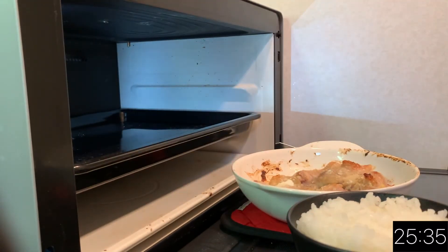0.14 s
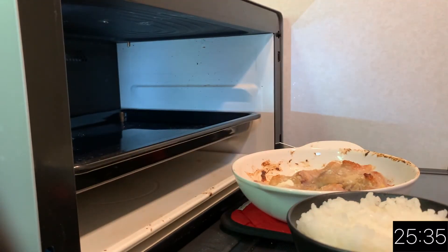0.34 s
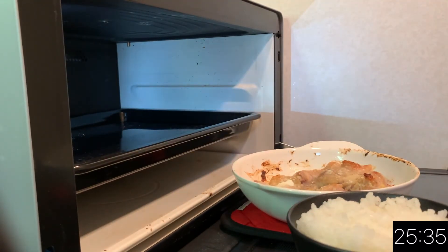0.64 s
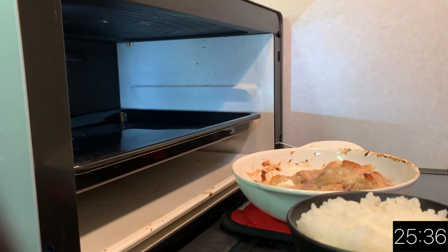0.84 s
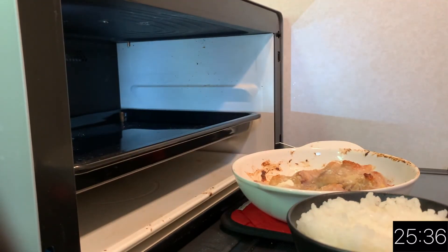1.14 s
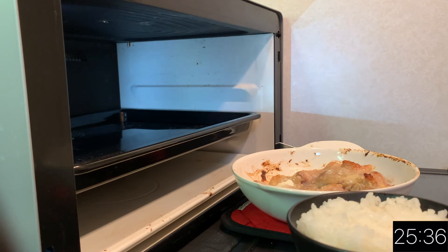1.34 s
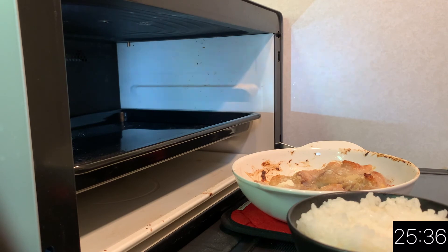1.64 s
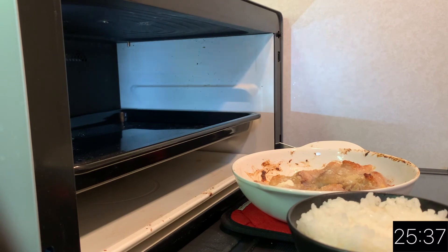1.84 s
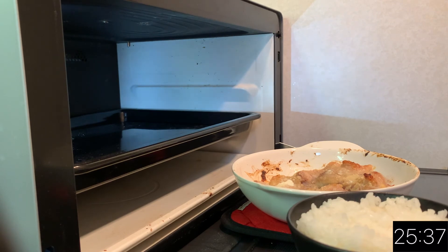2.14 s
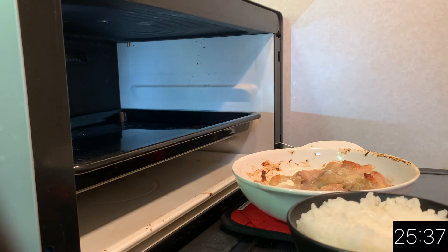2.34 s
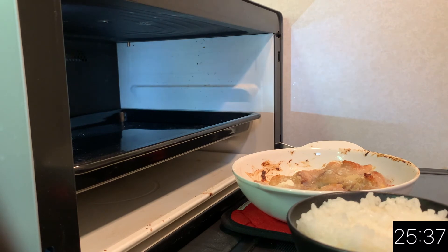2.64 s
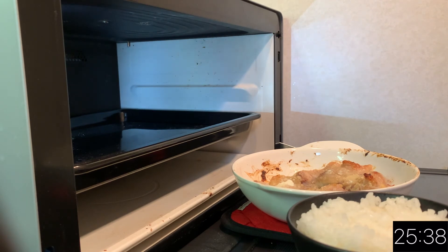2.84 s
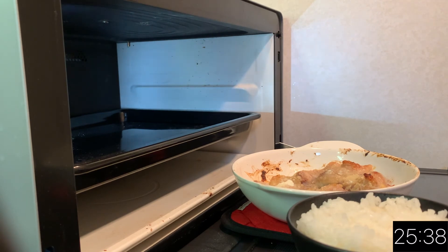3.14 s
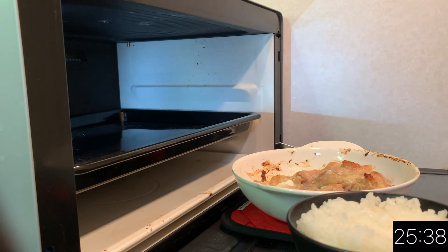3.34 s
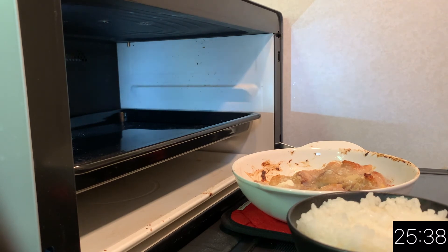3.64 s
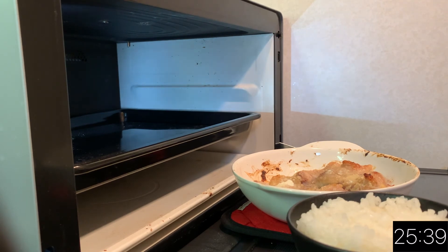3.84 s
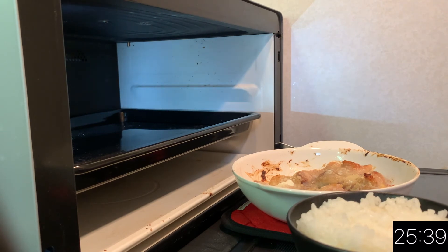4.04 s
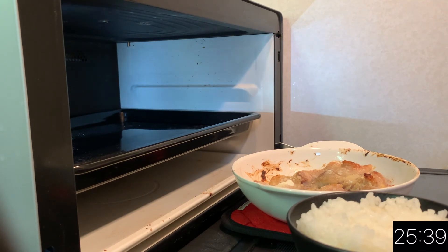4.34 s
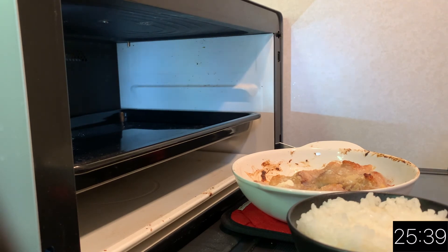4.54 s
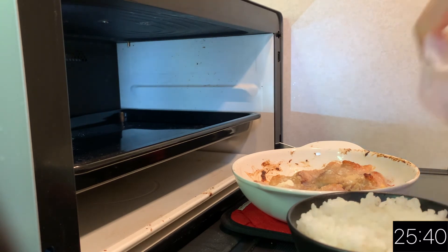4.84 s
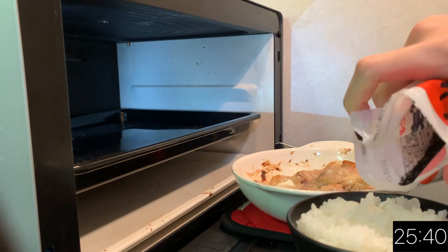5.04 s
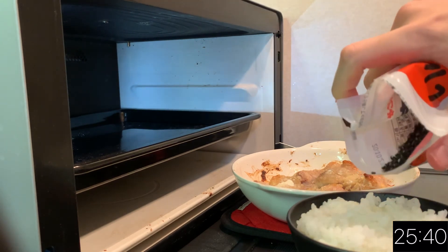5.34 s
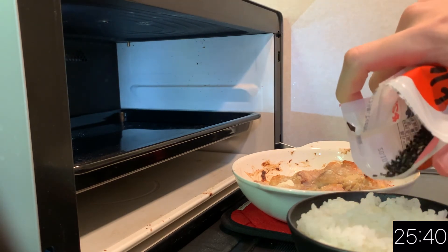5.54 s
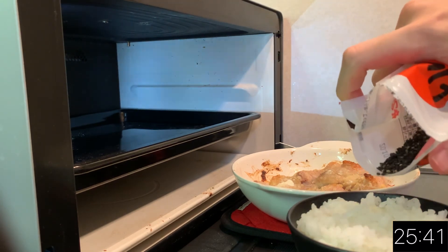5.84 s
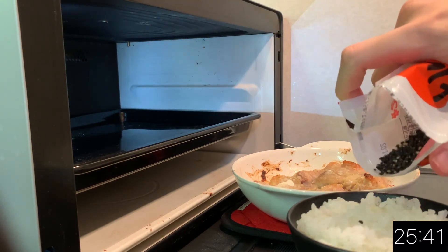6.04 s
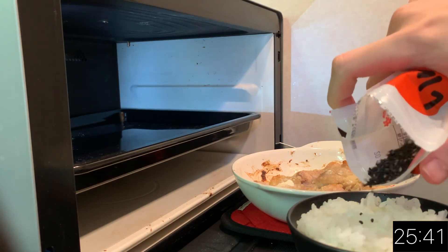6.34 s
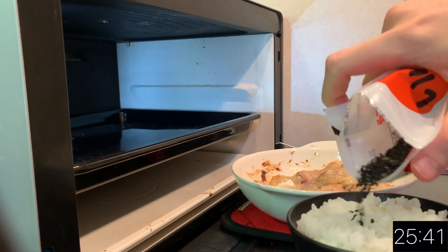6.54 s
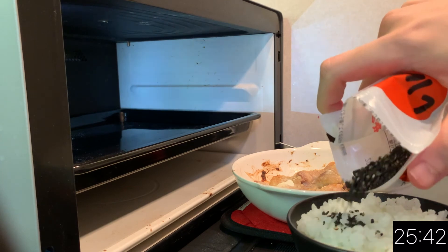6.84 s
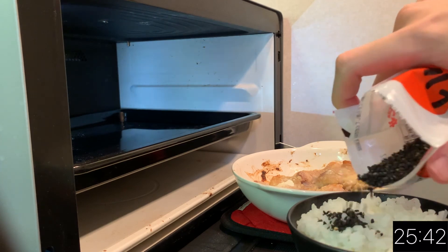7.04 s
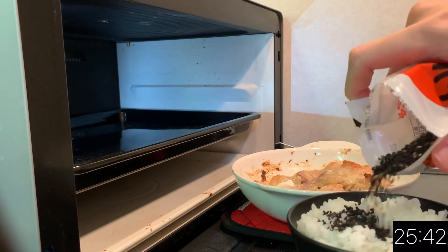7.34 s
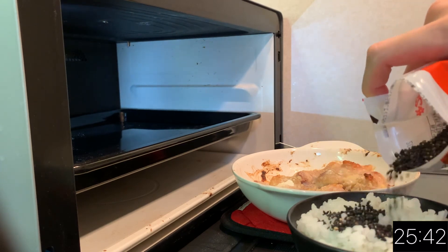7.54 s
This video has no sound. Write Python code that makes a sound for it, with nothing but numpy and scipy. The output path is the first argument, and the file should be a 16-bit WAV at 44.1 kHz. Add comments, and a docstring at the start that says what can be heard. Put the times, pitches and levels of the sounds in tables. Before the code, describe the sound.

A fan and humming appliance motors fill a small kitchen while a plastic packet rustles and clicks right by the microphone. After a brief loud crinkle and a soft low bump on the counter, the packet is tugged open with crisp, crowded snaps. It then goes much quieter: seeds slip along the plastic and trickle out in short, gentle shakes as the hum takes on a quick pulse.

```python
"""Sesame packet in a small kitchen

Close to a stereo pair of microphones, a plastic packet is picked up, pulled open and crinkled:
its folds snap and its film rubs under the fingers. Tipped and gently shaken over a bowl of rice,
it lets the seeds slide out. The counter takes one soft knock. Behind it all a fan blows and
appliance motors hum, two of their tones beating into a steady throb."""
import sys
import numpy as np
from scipy import signal
from scipy.fft import rfft, irfft
from scipy.io import wavfile

SR = 44100
rng = np.random.default_rng(int(sys.argv[2]) if len(sys.argv) > 2 else 0)


def master_out(mix):
    """Clip the mix to full scale and print it as 16-bit PCM to the path in sys.argv[1]."""
    frames = np.transpose(np.atleast_2d(mix))
    ceiling = np.clip(frames, -1, 1)
    pcm = np.round(ceiling * 32767).astype(np.int16)
    wavfile.write(sys.argv[1], SR, pcm)


N = 338688
TIME, FREQS = np.arange(N) / SR, np.fft.rfftfreq(N, 1 / SR)
TIPPED_S = 4.7
LEFT_RIGHT = np.array([[.5], [-.5]])


def from_db(db):
    return 10 ** (np.asarray(db) / 20)


def rms_one(x):
    return x / np.sqrt(np.mean(x ** 2) + 1e-20)


def unit_energy(x):
    return x / (np.linalg.norm(x, axis=-1, keepdims=True) + 1e-12)


def at_hz(points, hz):
    knots, values = np.transpose(points)
    return np.interp(np.log(hz + 1), np.log(knots), values)


def pan(left_over_right_db):
    return from_db(LEFT_RIGHT * left_over_right_db)


def band(x, hz, kind):
    return signal.sosfilt(signal.butter(2, hz, kind, fs=SR, output="sos"), x + 1e-18)


def drift(hz):
    """Smooth random wander of rms 1, mostly slower than hz."""
    step, settle = 40, 2000
    pole = np.exp(-2 * np.pi * hz * step / SR)
    noise = rng.standard_normal(N // step + settle + 2)
    slow = signal.lfilter([1], [1, -2 * pole, pole * pole], noise)[settle:]
    return np.interp(np.arange(N) / step, np.arange(len(slow)), rms_one(slow))


def colour(x, spectrum, size=2048):
    """Minimum-phase filter of unit energy, shaped by (Hz, dB) points."""
    cepstrum = irfft(np.log(from_db(at_hz(spectrum, np.fft.rfftfreq(size, 1 / SR)))))
    cepstrum[1:size // 2] *= 2
    cepstrum[size // 2 + 1:] = 0
    response = irfft(np.exp(rfft(cepstrum)))
    return signal.oaconvolve(x, unit_energy(response))[:N]


def grains(per_s, spread_db):
    """Tiny clicks of uneven size at random moments; rms 1."""
    sizes = from_db(spread_db * np.minimum(rng.exponential(1, N), 4)) * rng.choice([-1, 1], N)
    return rms_one(sizes * (rng.random(N) < per_s / SR))


def gestures(rows, attack_s=.019, release_s=.022):
    """Each movement rises, holds and dies away; overlapping ones add in power."""
    power = np.zeros(N)
    for start, length, db in rows:
        at = int(start * SR)
        age = TIME[at:at + SR] - TIME[at]
        rise = np.sin(np.pi / 2 * np.minimum(age / attack_s, 1)) ** 2
        fall = np.exp(-np.maximum(age - length, 0) / release_s)
        power[at:at + SR] += (from_db(db) * rise * fall) ** 2
    return np.sqrt(power)


def mic_pair(mid, side, likeness):
    """Left and right from two unrelated signals, with a likeness that depends on frequency."""
    alike = np.clip(at_hz(likeness, FREQS), -1, 1)
    common = np.sqrt((1 + alike) / 2) * rfft(mid)
    opposed = np.sqrt((1 - alike) / 2) * rfft(side)
    return irfft([common + opposed, common - opposed], N)


# The fan's air at the microphones. Each row: frequency in Hz, level in dB.
FAN_SPECTRUM = [(31, -55), (44, -20), (58, -2.5), (80, 0), (130, -2.5), (165, -4), (280, -4), (380, -3.5),
                (520, -10.5), (700, -6.5), (1080, -9), (1400, -14), (2000, -22), (3500, -29), (15000, -52)]
# Each row: frequency in Hz, likeness of left and right (held within -1 to 1 when played).
FAN_LIKENESS = [(50, 0.8), (130, 1), (280, 0.65), (520, 0.3), (1200, 0.42), (3000, -0.5), (12000, 3.5)]
# Each row: frequency in Hz, left over right in dB.
FAN_BALANCE = [(60, 3.5), (150, 1), (380, -1.5), (1300, -2), (5000, -0.5)]


def fan(db=-48):
    """An even rush of air fills the room behind the packet."""
    air = rfft(mic_pair(*rng.standard_normal((2, N)), FAN_LIKENESS))
    shaped = air * from_db(at_hz(FAN_SPECTRUM, FREQS)) * pan(at_hz(FAN_BALANCE, FREQS))
    return from_db(db) * rms_one(irfft(shaped, N))


# Fan, compressor and mains in the background.
# Each row: frequency in Hz, level in dB, left over right in dB, lead at the left in radians.
HUM_TONES = [(45.7, -59, 1, 0), (100, -64, 1, 0), (119.4, -64, 7, -.7), (131.5, -65, 2, .1),
             (191.9, -49.5, 6, -1.1), (201.2, -65, 5, -.6), (319.6, -55.3, 1, .1), (335.8, -61.5, 0, 0),
             (384.7, -66, -4, -.9), (399.7, -63.5, -1, -1.4), (439.7, -66, -1, 0), (671.6, -66, -2, .6),
             (1343.2, -61, -4, .6)]
# A second motor tone, just below the strongest. Each row: time in seconds, level in dB.
THROB_LEVEL = [(0, -58), (.5, -65), (3.3, -66), (4, -58), (4.9, -51.3), (7.68, -51.3)]


def hum(waver_db=1.35, wander_rad_per_hz=.002, beat_hz=9.26, crest_s=6.173):
    """Motor tones whose phase wanders more the higher they are; the close pair throbs."""
    def tone(phase, db, side_db, lead):
        return np.sqrt(2) * from_db(db) * pan(side_db) * np.cos(phase + lead * LEFT_RIGHT)

    turn = 2 * np.pi * (TIME - crest_s)
    out = np.zeros((2, N))
    for hz, db, side_db, lead in HUM_TONES:
        phase = hz * (turn + wander_rad_per_hz * drift(.88))
        out += tone(phase, db + waver_db * drift(8.5), side_db, lead)
    strongest_hz = max(HUM_TONES, key=lambda row: row[1])[0]
    throb_db = np.interp(TIME, *np.transpose(THROB_LEVEL))
    return out + tone((strongest_hz - beat_hz) * turn, throb_db, side_db=6.9, lead=.88)


def counter_knock(start_s=1.768, hz=55, swell_s=.026, db=-26.5):
    """A soft knock on the counter, left of centre: a few deep cycles."""
    age = np.maximum(TIME - start_s, 0)
    swell = (age / swell_s) ** 2 * np.exp(2 * (1 - age / swell_s))
    return from_db(db) * swell * np.sin(2 * np.pi * hz * age) * pan(3.4)


def echo_pattern(near_db=1, near_s=.0043, tail_db=-7.5, t60_s=.32):
    """Quick reflections off the nearby oven and wall, then the ring of the room."""
    t = np.arange(SR // 2) / SR
    shape = (2, len(t))
    sparse = rng.standard_normal(shape) * (rng.random(shape) < .2)
    near = sparse * np.exp(-t / near_s) * (t > .0004)
    tail = rng.standard_normal(shape) * from_db(-60 * t / t60_s) * (1 - np.exp(-t / .0045))
    return from_db(near_db) * unit_energy(near) + from_db(tail_db) * unit_energy(tail)


# The direct path. Each row: frequency in Hz, phase of the left microphone re the right in radians.
DIRECT_PHASE = [(20, 0), (280, -.5), (520, -2.9), (1200, -3.3), (2100, -5.6), (3100, -8.6), (4300, -13),
                (6800, -18.8), (20000, -18.8)]
# The room's echoes. Each row: frequency in Hz, likeness of left and right from -1 to 1.
ROOM_LIKENESS = [(250, .7), (520, -.6), (1200, -.4), (2200, -.1), (5000, 0), (6800, .5), (9700, .1),
                 (16000, .1)]


def kitchen(x, spots=7, dwell_s=.045):
    """Direct sound plus echoes, whose pattern changes as the sound moves about the packet."""
    spot = (TIME / dwell_s).astype(int) % spots
    absorbed = colour(x, [(500, 7), (2500, 3), (8000, 4), (16000, -7)])  # walls soak up some treble
    echoes = np.zeros((2, N))
    for k in range(spots):
        echoes += signal.oaconvolve((absorbed * (spot == k))[None], echo_pattern(), axes=1)[:, :N]
    left = irfft(rfft(x) * np.exp(1j * at_hz(DIRECT_PHASE, FREQS)), N)
    return (np.array([left, x]) + mic_pair(*echoes, ROOM_LIKENESS)) * pan(-.44)


# Shakes over the bowl. Each row: start in seconds, length in seconds, level in dB.
SEED_SHAKES = [(4.74, 0.19, -49), (4.95, 0.15, -57), (5.2, 0.097, -57.5), (5.36, 0.14, -61),
               (5.58, 0.028, -55.5), (5.865, 0.073, -62.5), (6.025, 0.12, -57.5), (6.15, 0.029, -61),
               (6.25, 0.031, -62), (6.42, 0.17, -58), (6.62, 0.098, -58), (6.78, 0.13, -62),
               (7.035, 0.12, -59), (7.21, 0.13, -58.5), (7.46, 0.11, -65.5), (7.62, 0.055, -62.5)]
# Seeds on film. Each row: frequency in Hz, level in dB.
SEED_SPECTRUM = [(500, -18), (1400, -1.5), (2200, 1.5), (3200, 2), (4300, -2), (6000, -3), (7200, 0),
                 (8800, 2), (10000, -4.5), (15000, 2.5), (16500, -38)]
# The hollow of the tipped packet. Each row: resonance in Hz, sharpness as Q, gain in dB.
HOLLOW_MODES = [(2180, 14, -9), (3140, 14, -10), (4100, 20, -8), (4480, 20, -9)]


def seeds(slide_db=2, bounce_db=-12.5, trickle_db=-73.5):
    """Seeds slide with each shake and trickle between; a few bounce, and all ring the hollow."""
    flow = gestures(SEED_SHAKES, attack_s=.042, release_s=.046)
    flow += from_db(trickle_db) * (TIME > TIPPED_S)
    sliding = colour(grains(4000, 3.4), SEED_SPECTRUM) * from_db(slide_db)
    bouncing = band(colour(grains(70, 2), SEED_SPECTRUM), 9000, "low") * from_db(bounce_db)
    ticks = (sliding + bouncing) * flow
    ring = sum(from_db(db) * signal.lfilter(*signal.iirpeak(hz, q, fs=SR), ticks + 1e-18)
               for hz, q, db in HOLLOW_MODES)
    return ticks + ring


# Fingers shifting their hold.
# Each row: start in seconds, length in seconds, rubbing in dB, crackle in dB.
FINGER_STROKES = [(0.0, 0.031, -52, -62), (0.076, 0.02, -51.5, -81), (0.131, 0.055, -49, -52),
                  (0.204, 0.015, -48, -54), (0.399, 0.082, -51.5, -64), (0.512, 0.12, -53.5, -68),
                  (0.873, 0.019, -45, -49), (0.977, 0.16, -52, -60), (1.05, 0.17, -42, -45),
                  (1.337, 0.04, -55, -58.5), (1.612, 0.17, -53, -55.5), (1.708, 0.098, -44.5, -60),
                  (1.86, 0.027, -53.5, -58), (1.973, 0.098, -55.5, -67), (2.216, 0.092, -50.5, -53.5),
                  (2.356, 0.022, -51.5, -66), (2.435, 0.016, -58, -86), (2.577, 0.019, -61, -57),
                  (2.714, 0.066, -51.5, -55), (2.834, 0.015, -52, -63), (2.983, 0.018, -48.5, -57)]
# The top being pulled open. Each row: time in seconds, rustle in dB.
OPENING_PULL = [(3.03, -46), (3.06, -57), (3.18, -49.5), (3.28, -53), (3.4, -45), (3.44, -51), (3.56, -49),
                (3.66, -53), (3.87, -55), (3.98, -52.5), (4.35, -54), (4.54, -49), (4.61, -67), (4.75, -61)]
# Grips that flex the whole packet. Each row: start in seconds, length in seconds, level in dB.
HAND_GRIPS = [(1.095, 0.1, -35), (1.166, 0.032, -31.5), (1.71, 0.066, -48.5), (5.984, 0.012, -50)]


def handling(pull_crackle_db=-17, pull_flex_db=2.5, pull_strain_db=-4):
    """How strongly the hands rub, crackle, flex and strain the packet from moment to moment."""
    pull = from_db(np.interp(TIME, *np.transpose(OPENING_PULL), left=-120, right=-120))
    rub = gestures([(s, length, db) for s, length, db, _ in FINGER_STROKES]) + pull
    crackle = gestures([(s, length, db) for s, length, _, db in FINGER_STROKES])
    crackle += pull * from_db(pull_crackle_db)
    flex = gestures(HAND_GRIPS) + pull * from_db(pull_flex_db)
    strain = rub + pull * from_db(pull_strain_db)
    return rub, crackle, flex, strain


def deforming(x, depth_db, rate_hz, bands=18):
    """The film's resonances shift as it bends: each narrow range swells and fades on its own."""
    place = np.interp(np.log(FREQS + 1), np.log([1200, 16000]), [0, bands - 1])
    spectrum = rfft(x)
    ranges = (irfft(spectrum * np.maximum(1 - abs(place - k), 0), N) for k in range(bands))
    return sum(part * from_db(depth_db * drift(rate_hz)) for part in ranges)


# Rubbed film, crackling film and flexing pouch, close up. Each row: frequency in Hz, level in dB.
RUB_SPECTRUM = [(300, -49), (1200, 13), (2250, 6), (3300, 10.5), (4600, 8), (7000, -0.5), (9600, -5.5),
                (11500, -12), (14000, -24), (16500, -26)]
CRACKLE_SPECTRUM = [(150, -5), (400, -13), (700, 9), (1300, 6), (2200, 3.5), (3300, -3), (4400, -4),
                    (6500, 8), (9500, 6.5), (11500, 8), (14000, -3), (16000, -9)]
POUCH_SPECTRUM = [(40, -11), (90, -3), (160, -6), (260, -3), (400, 1), (520, -3), (750, -3), (1150, -4),
                  (1650, -5), (2150, 0), (3000, -10), (6000, -22)]


def rustle(rub, crackle, flex, rub_db=-3, flex_db=-4):
    """Micro-creases under the fingers, a bright crackle and the duller noise of the flexing pouch."""
    film = colour(grains(1400, 2.9), RUB_SPECTRUM) * rub * from_db(rub_db)
    bright = colour(grains(2600, 4), CRACKLE_SPECTRUM) * crackle
    pouch = colour(grains(2000, 1.1), POUCH_SPECTRUM) * flex * from_db(flex_db)
    return deforming(film + bright + pouch, depth_db=2.5, rate_hz=15)


def lesser_folds(strain, per_s=48, above_db=24, spread_db=5):
    """Small folds give way at random, louder as the film is strained; rows like FOLD_SNAPS."""
    count = int(per_s * TIPPED_S)
    times = (np.arange(count) + 1 + rng.random(count)) / (count + 1) * TIPPED_S
    size, broad_pitch, broad_ring, narrow_pitch, narrow_ring = rng.uniform(-1, 1, (count, 5)).T
    strain_db = 20 * np.log10(strain[(times * SR).astype(int)] + 1e-9)
    db = np.minimum(strain_db + above_db, -20) + spread_db * size
    broad = 2450 * 1.27 ** broad_pitch, 14 + 7 * broad_ring
    narrow = 5000 * 1.4 ** narrow_pitch, 11 + 7 * narrow_ring
    return [(*row, 0, -14) for row in zip(times, db, *broad, *narrow)]


def facet(hz, centre_hz, db, q):
    """Power response of a patch of film ringing at one pitch."""
    return from_db(db) ** 2 * (1 + (q * (hz / centre_hz - centre_hz / hz)) ** 2) ** -2


# Folds snapping over, close to the microphones. Each row: start in seconds, level in dB,
# broad facet in Hz and its ring in dB, narrow facet in Hz and its ring in dB,
# ring of the tiniest facets in dB, run-on of small creases in dB.
FOLD_SNAPS = [(0.0517, -21, 2480, 26, 5800, 13, -13, -18), (0.145, -22, 3200, 6, 5100, 9, -5, -5),
              (0.1722, -20, 3200, 5, 5600, 14, -9, -6), (0.4511, -19.5, 2050, 30, 4400, 16, -9, -16),
              (0.6168, -17.5, 2200, -5, 8600, 7, 9, -1.5), (0.7303, -15.5, 2100, 14, 5700, 3, 12, -7.5),
              (0.8875, -28.5, 1800, 30, 4700, 4, -7, -2), (0.8955, -20.5, 1700, 30, 4700, -2, 6, -18.5),
              (1.1171, -9, 1650, 23, 4820, 18, -10, -7), (1.1318, -12, 2140, 27, 7590, 17, -7, -13),
              (1.1434, -11, 2100, 24, 4870, 12, 5, -15), (1.1554, -4, 2130, 25, 3800, 8, 31, -17),
              (1.1835, -3.5, 3070, 12, 5100, 13, 2, -5), (1.1895, -2.5, 2110, 17, 4500, 12, 17, -6.5),
              (1.1925, -3.5, 2200, 19, 4500, 17, 3, -6), (1.2326, -18, 2200, 28, 6000, 5, 21, -5),
              (1.2489, -13.5, 2000, 24, 3800, 2, 12, -10), (1.4667, -23.5, 1910, 24, 4000, 2, 18, 1.5),
              (1.4883, -13.5, 1890, 9, 4400, 1, 9, -6.5), (1.5823, -25.5, 2820, 12, 5700, 11, -13, 0.5),
              (1.7249, -13, 1830, -13, 4400, -10, 8, 5.5), (1.9394, -21, 2350, -8, 4400, 3, -9, -1),
              (1.994, -22.5, 2690, 23, 4900, 13, 12, -2.5), (2.1614, -24, 2680, 19, 4070, 26, -9, -12),
              (2.2214, -14.5, 1720, 1, 4300, 3, 14, -5), (2.3726, -26.5, 1830, 17, 4700, 7, -9, 0),
              (2.7253, -20.5, 1500, -4, 5400, 8, 15, -3), (2.8463, -19.5, 3200, 21.5, 5400, 24, -9, 2),
              (2.9456, -22.5, 1870, 21, 4100, 18, -6, -2), (2.9975, -24, 1900, 20, 4400, 13, -2, -11),
              (3.0400, -10.5, 2210, 7, 5400, 21, 8, 4.5), (3.0441, -0.5, 2130, 0, 9000, 9, 11, -3),
              (3.0735, -3, 1500, -15, 4200, 10, 19, 0), (3.1214, -11.5, 1990, -11, 7500, -4, 1, -10),
              (3.1629, -12.5, 2650, 7, 4600, 9, 1, -4.5), (3.2024, -21, 2900, 25, 4300, 3, -3, 0),
              (3.2198, -18, 3180, 30, 5490, 11, -9, -5), (3.2995, -17, 2750, 14, 5060, 13, -4, -11),
              (3.3451, -3.5, 1640, -13, 3800, 2, 13, -9), (3.3574, -8.5, 2210, 23, 4700, 22, 3, -14),
              (3.3644, -15, 2280, 15, 4030, 11, -3, -13), (3.4018, -9, 2410, 13, 4600, 9, -9, -4),
              (3.4569, -2.5, 2520, 13.5, 6700, 10, 9, -20), (3.4905, -8.5, 2090, 13, 6100, 11, -3, -9),
              (3.4978, -9.5, 2210, 30, 6340, 2, 0, 0), (3.5073, -4, 2960, 3, 6700, 0, 3, -21),
              (3.5517, -13.5, 1990, 27, 4300, 12, -6, -29), (3.6076, -17, 2250, 27, 4500, 4, 5, -29),
              (3.6342, -14, 1760, 23, 6200, 12, -3, -28), (3.6955, -19.5, 1950, 28, 8890, 3, 4, -13),
              (3.7463, -14, 1950, 19, 5300, 10, -7, -0.5), (3.7572, -7.5, 2100, 12.5, 7300, 0, 4, -3),
              (3.863, -16.5, 2020, 20, 5800, 19, -9, -14), (3.9015, -7.5, 2910, 15.5, 5700, 20.5, -6, -15),
              (3.9295, -12.5, 2380, 8, 6300, -2, -6, 4), (3.9416, 2.5, 2850, 4, 4400, 9, 8.5, -8),
              (3.9699, -10.5, 2000, 23, 5400, 10, -6, -5), (4.0478, -12.5, 2230, 22, 5400, 11, 15, -28),
              (4.0806, -3, 2820, -3, 6500, 5, 19, -5), (4.0882, 0, 1970, 6.5, 6100, 16, 13, -22.5),
              (4.1691, -14.5, 2400, 10, 6200, 5.5, -5, -5), (4.1838, -11.5, 2020, 29, 4800, 13, -8, -7),
              (4.2143, -16, 2060, 25, 5300, 14, -6, -3), (4.2345, -4.5, 1900, 22, 5900, 14, -6, -1),
              (4.246, -2, 3200, 9.5, 9000, 6, 3, -1), (4.3487, -13.5, 2110, 6, 7000, 12, 1, -27),
              (4.3854, -7.5, 1950, 8, 6500, -8, 0, -26), (4.4331, -4, 2880, 13.5, 6400, 15, -1, -4),
              (4.4504, -8.5, 2020, 8, 7600, 6, -6, -30), (4.5235, -21.5, 1880, 14, 7040, 17, -6, 7),
              (4.5556, -13, 1950, 8, 3900, -6, -11, 3.5), (4.5691, -14.5, 2210, 11, 6900, 9, 15, -27),
              (4.6841, -11, 1500, 1, 7600, 11.5, 9, -11), (4.7547, -15, 2530, 5, 8000, 6, 11, -3),
              (5.5135, -29, 2200, 0, 8500, 15, 19, -24), (5.6258, -28, 2300, 18, 3900, 17, -9, 0),
              (5.9912, -18, 2870, 8, 4800, 11, -20, -7)]
# The bare crack and the creases after it. Each row: frequency in Hz, level in dB.
CRACK_SPECTRUM = [(150, -8), (700, -3), (1500, 1), (3500, -1), (7000, -0.5), (9500, -2), (12500, 0.5),
                  (15000, 2.5), (16500, -39.5)]
CREASE_SPECTRUM = [(200, -10), (700, -0.5), (1500, -0.5), (2200, -3.5), (3500, 0), (6500, -3), (9500, -1),
                   (11500, -2.5), (14000, -1), (16500, -25)]


def snaps(strain, delay_s=.000345, run_on_s=.015, shared_db=-5.5, loose_db=-5, size=4096):
    """A fold cracks and rings its facets; small creases run on, partly through the same facets."""
    folds = list(FOLD_SNAPS) + lesser_folds(strain)
    out, loose = np.zeros(N + 2 * size), np.zeros(N + size)
    creases = grains(4500, 6.6)
    age, hz = np.arange(size) / SR, np.fft.rfftfreq(size, 1 / SR) + 1
    run_shape = (1 - np.exp(-age / .003)) * np.exp(-age / run_on_s)
    for start, db, broad_hz, broad_db, narrow_hz, narrow_db, tiny_db, run_db in folds:
        at = int(start * SR)
        delay_at_4khz = delay_s * rng.uniform(.6, 1.4)  # bending waves carry the highs first
        crack = unit_energy(irfft(np.exp(-4j * np.pi * delay_at_4khz * np.sqrt(4000 * hz))))
        run_on = unit_energy(creases[at:at + size] * run_shape) * from_db(run_db - 2)
        power = (from_db(at_hz(CRACK_SPECTRUM, hz)) ** 2
                 + facet(hz, broad_hz, broad_db, q=2.56)
                 + facet(hz, narrow_hz, narrow_db, q=3.5)
                 + facet(hz, 11100, tiny_db, q=9.7))
        snap = colour(crack + from_db(shared_db) * run_on, np.transpose([hz, 10 * np.log10(power)]))
        out[at:at + len(snap)] += from_db(db) * snap
        loose[at:at + size] += from_db(db + loose_db) * run_on
    creasing = deforming(colour(loose[:N], CREASE_SPECTRUM), depth_db=7.5, rate_hz=46)
    return band(out[:N] + creasing, 109, "high")  # the light film radiates little bass


def scene():
    """The packet up close in the kitchen, the steady machines behind it."""
    rub, crackle, flex, strain = handling()
    packet = snaps(strain) + rustle(rub, crackle, flex) + seeds()
    return kitchen(packet) + counter_knock() + hum() + fan()


def record(dry):
    """Both microphone channels are cut steeply above 16.6 kHz."""
    return signal.sosfilt(signal.ellip(10, .2, 80, 16600, fs=SR, output="sos"), dry)


dry = scene()
out = record(dry)
master_out(out)
```